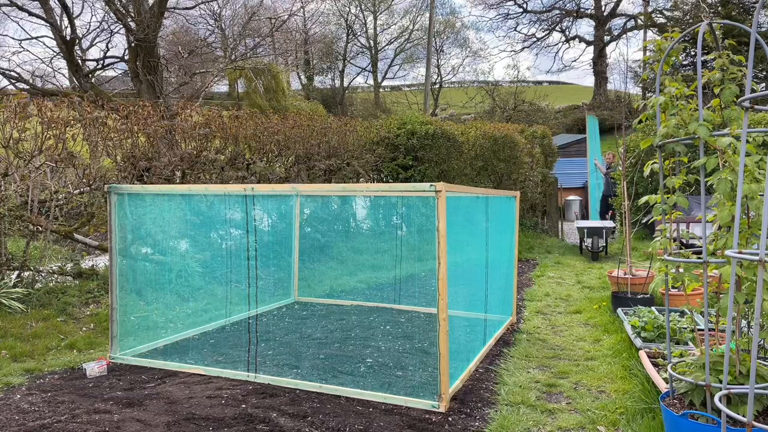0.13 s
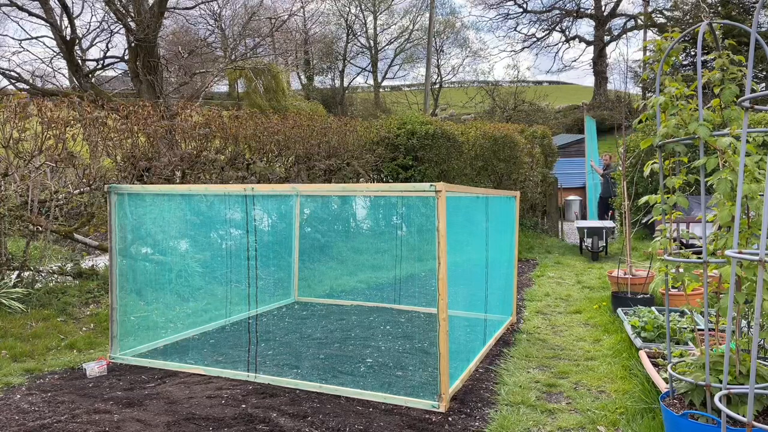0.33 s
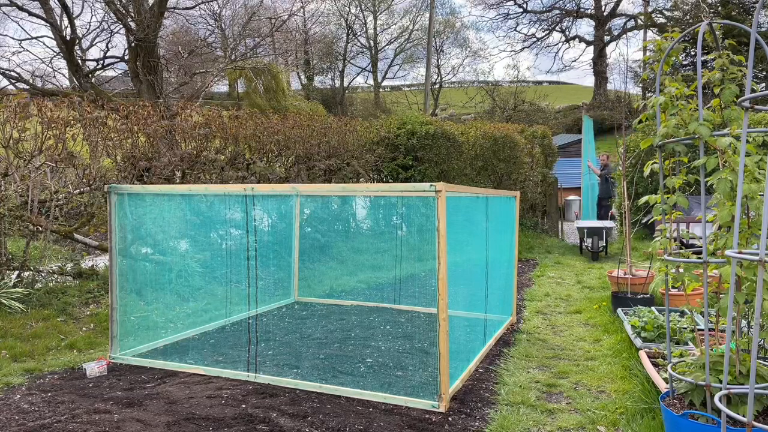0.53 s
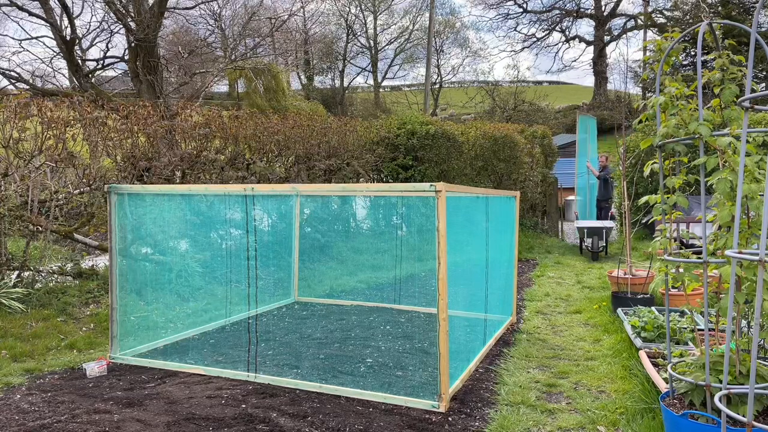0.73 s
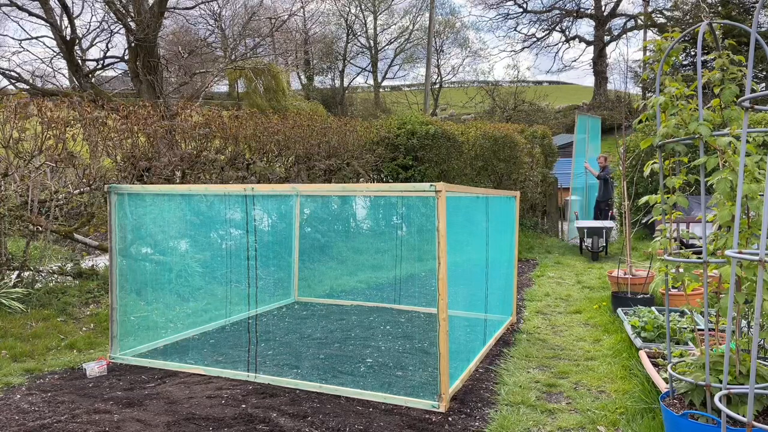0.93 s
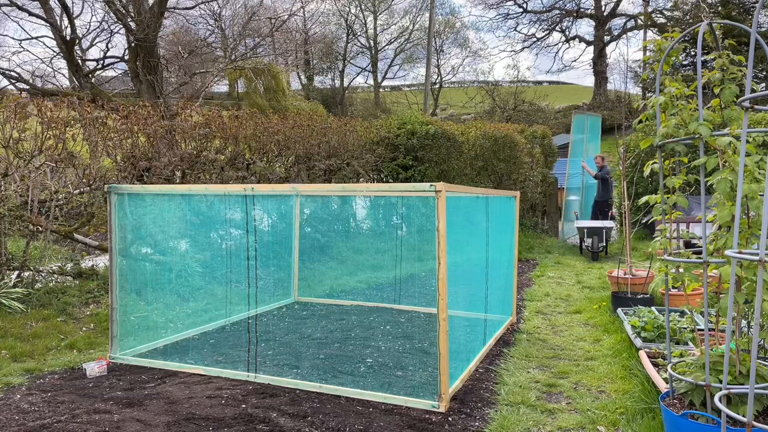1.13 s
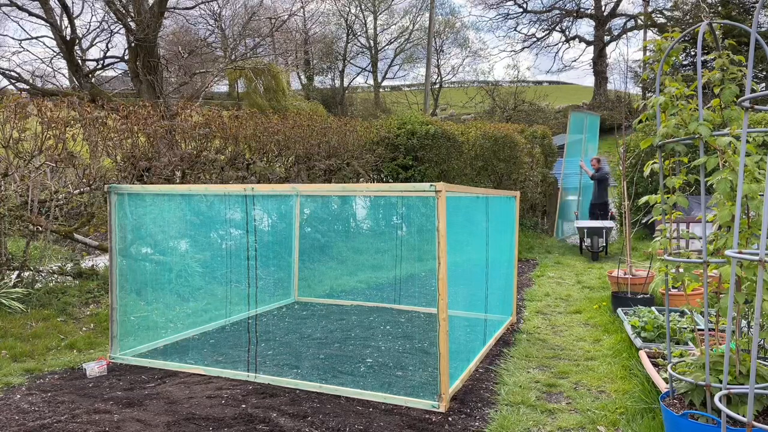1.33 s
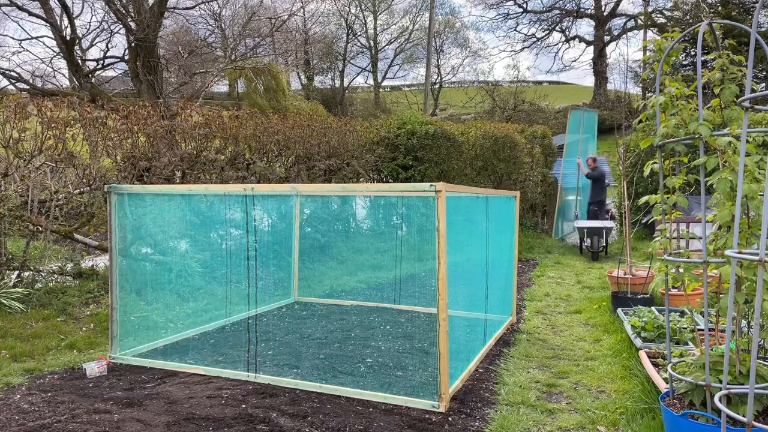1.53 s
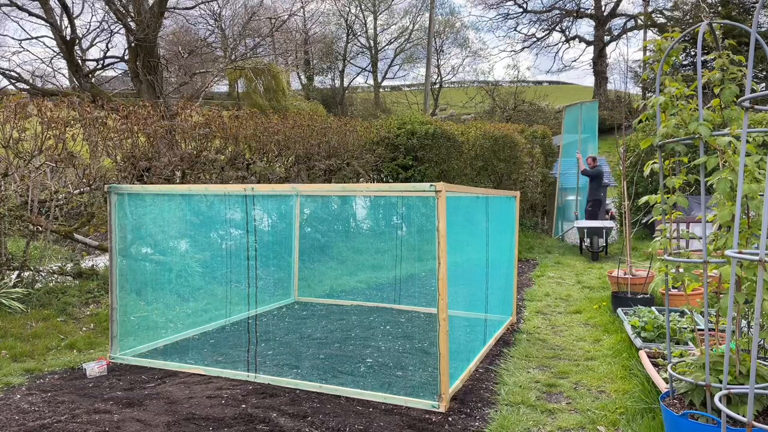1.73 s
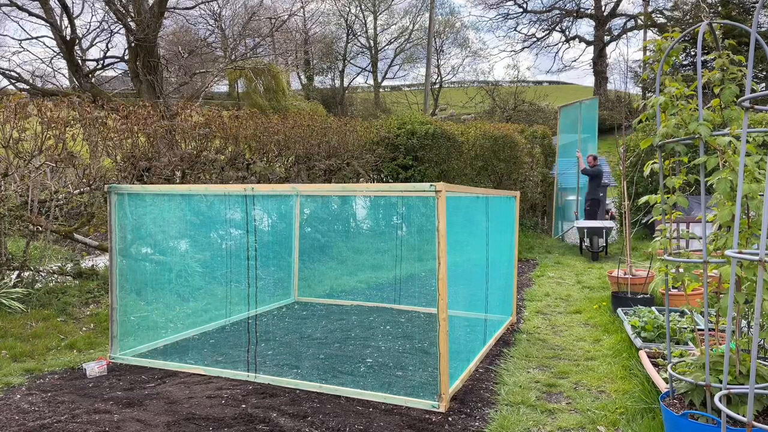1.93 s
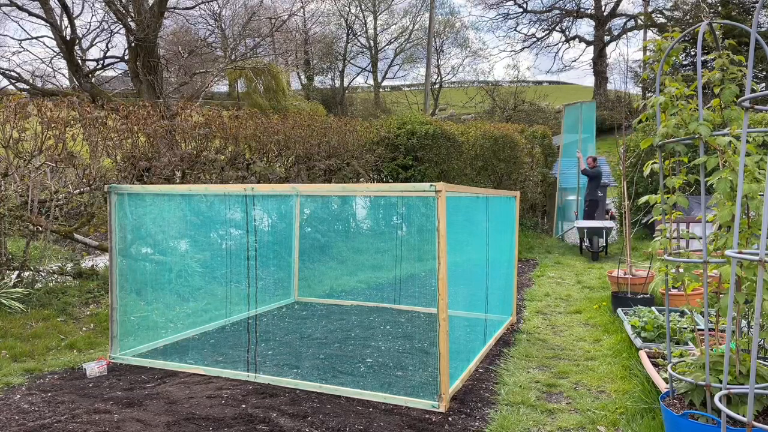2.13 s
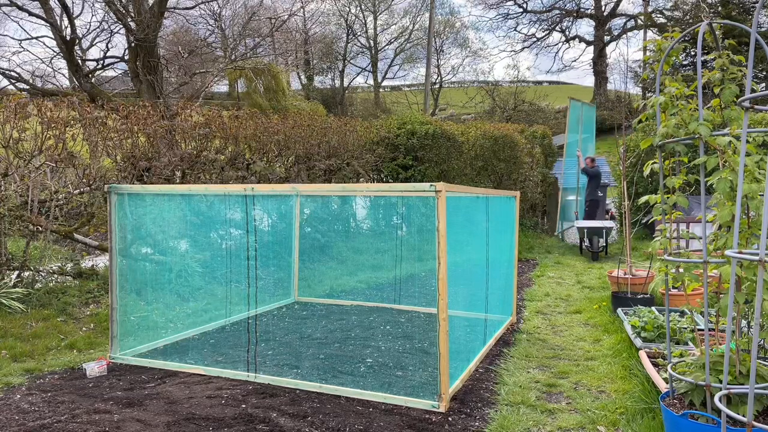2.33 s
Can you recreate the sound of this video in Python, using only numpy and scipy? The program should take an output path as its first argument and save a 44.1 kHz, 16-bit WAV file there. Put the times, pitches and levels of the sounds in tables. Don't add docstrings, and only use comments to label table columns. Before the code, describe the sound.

Sheep bleating faintly, one short call then a longer falling one, after crunchy steps on gritty ground; a netted frame brushes and finally squeaks, with small bird whistles outdoors, heard through a simple handheld microphone.

```python
import sys
import numpy as np
from scipy import signal
from scipy.fft import rfft, irfft, next_fast_len
from scipy.io import wavfile
from scipy.ndimage import uniform_filter1d, map_coordinates

SR = 44100
rng = np.random.default_rng(int(sys.argv[2]) if len(sys.argv) > 2 else 0)


def generate_wav(signal):
    frames = np.transpose(np.atleast_2d(signal))
    scaled = np.clip(frames, -1, 1) * 32767
    pcm = np.round(scaled).astype(np.int16)
    wavfile.write(sys.argv[1], SR, pcm)


def voltage_ratio(level):
    return 10 ** (np.asarray(level, float) / 20)


N = 108045


def unit(x):
    return x / np.sqrt(np.mean(x ** 2) + 1e-20)


def filtered(x, response):
    m = next_fast_len(N + SR // 2)
    return irfft(rfft(x, m) * response(np.fft.rfftfreq(m, 1 / SR)), m)[:N]


def coloured(x, spectrum):
    f, db = np.transpose(spectrum)
    return unit(filtered(x, lambda hz: voltage_ratio(np.interp(np.log(hz + 1), np.log(f + 1), db))))


def resonant(x, peaks):
    def response(f):
        total = 0
        for k, (centre, width, db) in enumerate(peaks):
            mode = 1j * f * width / (centre * centre - f * f + 1j * f * width)
            total = total + (-1) ** k * voltage_ratio(db) * mode ** 2
        return total
    return unit(filtered(x, response))


def wobble(rate):
    knots = rng.standard_normal(int(N * 400 / SR) + 4)
    return map_coordinates(knots, [np.arange(N) * min(rate, 400) / SR])


def strokes(rows, attack_s, t60=None):
    t = np.arange(N) / SR
    power = np.zeros(N)
    for row in rows:
        start, hold, db = row[:3]
        release_s = t60 or row[3]
        fall_db = 60 * np.clip(t - start - hold, 0, 2) / release_s
        power += (voltage_ratio(db - fall_db) * np.clip((t - start) / attack_s, 0, 1)) ** 2
    return np.sqrt(power)


def gritty(spectrum, per_s, bed, lumps_db, lumps_per_s, colour=coloured):
    clicks = (rng.random(N) < per_s / SR) * np.clip(rng.standard_normal(N), -2, 2)
    grains = colour(unit(clicks) + bed * rng.standard_normal(N), spectrum)
    return unit(grains * voltage_ratio(lumps_db * np.clip(wobble(lumps_per_s), -2, 2)))


# frequency in Hz, density in dB per Hz.
WIND_SPECTRUM = [(300, -28), (1480, -15), (3000, -18.5), (4300, -17.5), (5200, -24.5), (7500, -42.5)]
# time in seconds, level in dB.
WIND_LEVEL = [(0, -69.5), (0.201, -69.5), (0.6, -80), (.9, -68), (0.97, -76), (1.101, -58), (2.25, -67.5),
              (2.33, -73), (2.45, -72)]


def air():
    z = signal.stft(rng.standard_normal(N + 512), nperseg=512)[2]
    field = uniform_filter1d(rng.standard_normal(z.shape), size=5, axis=0)
    field = uniform_filter1d(field, size=5, axis=1)
    noise = signal.istft(z * voltage_ratio(4 * unit(field)), nperseg=512)[1][:N]
    level_db = np.interp(np.arange(N) / SR, *np.transpose(WIND_LEVEL))
    return coloured(noise, WIND_SPECTRUM) * voltage_ratio(level_db)


# start in seconds, length in seconds, first and last frequency in Hz, level in dB.
WHISTLES = [(0.179, 0.028, 4470, 4340, -57), (0.468, 0.029, 4300, 5100, -68),
            (0.569, 0.064, 3100, 4660, -74.5), (0.673, 0.056, 3800, 5770, -73),
            (0.804, .02, 3760, 4150, -50.5), (0.924, 0.019, 4100, 5030, -64.5),
            (0.946, 0.017, 4150, 5170, -63), (1.019, 0.022, 3850, 3560, -60.5),
            (1.041, 0.1, 5650, 5350, -71), (1.128, 0.039, 5290, 5350, -59), (1.464, 0.11, 4000, 4000, -52),
            (2.05, 0.028, 4330, 4300, -64), (2.376, 0.062, 4230, 4450, -47)]


def birds():
    blur_hz, bend, soft, waver_db = 90, .75, .75, 3
    out, t = np.zeros(N), np.arange(N) / SR
    blur = blur_hz * wobble(300)
    for start, length, from_hz, to_hz, db in WHISTLES:
        u = np.clip((t - start) / length, 0, 1)
        hz = blur + from_hz + (to_hz - from_hz) * u ** bend
        swell = np.sin(np.pi * u ** soft)
        out += voltage_ratio(db + 3.5) * swell * np.sin(2 * np.pi * np.cumsum(hz) / SR)
    return out * voltage_ratio(waver_db * wobble(120))


# start in seconds, hold in seconds, level in dB, t60 in seconds.
SWISHES = [(.24, 0.033, -37.5, 0.082), (.298, 0.014, -43.5, 0.15), (1.06, 0.031, -70, .1),
           (1.11, 0.039, -47, 0.11), (1.21, 0.061, -48, 0.53), (1.27, 0.017, -49, 0.07),
           (1.34, 0.11, -41.5, 0.27), (1.48, 0.029, -53, 0.12), (1.58, 0.056, -45.5, 0.18),
           (1.678, 0.022, -41, 0.13), (1.73, 0.1, -52, 0.12), (1.9, .11, -55.5, 0.1)]
# frequency in Hz, density in dB per Hz.
NET_SPECTRUM = [(1500, -29.5), (2700, -11.5), (3700, 1.5), (4500, -7.5), (6500, -55)]


def netting():
    return strokes(SWISHES, 0.017) * gritty(NET_SPECTRUM, per_s=1100, bed=1.0, lumps_db=0.5, lumps_per_s=73)


# start in seconds, hold in seconds, level in dB, t60 in seconds.
SQUEAKS = [(2.11, 0.056, -61.5, 0.13), (2.165, 0.014, -48, .08), (2.18, 0.02, -46, 0.055),
           (2.215, 0.033, -54, 0.045), (2.28, 0.014, -66, 0.03)]
# frequency in Hz, width in Hz, level in dB.
FRAME_MODES = [
    (3045, 230, 1),
    (2465, 480, -11),
]


def squeak():
    return strokes(SQUEAKS, 0.004) * resonant(rng.standard_normal(N), FRAME_MODES)


# start in seconds, hold in seconds, level in dB.
THUDS = [(0.01, 0.012, -68), (.235, 0.069, -56), (.34, 0.2, -63), (.79, 0.12, -65.5), (1.06, 0.58, -65),
         (1.28, 0.042, -52.5), (1.375, 0.093, -51.5), (1.57, 0.1, -56.5), (1.684, 0.013, -34.5),
         (1.715, .12, -54), (1.9, 0.14, -64), (2.07, 0.044, -66), (2.125, 0.052, -57), (2.195, .07, -61),
         (2.29, 0.17, -72)]
# frequency in Hz, width in Hz, level in dB.
GROUND_MODES = [(92, 54, -31.5), (216.3, 138, -0.5), (320, 91, -0.5), (416.7, 180, -2)]


def thuds():
    ground = gritty(GROUND_MODES, per_s=200, colour=resonant, bed=1.7, lumps_db=3.0, lumps_per_s=27)
    return strokes(THUDS, 0.0069, 0.15) * ground


# start in seconds, hold in seconds, level in dB, t60 in seconds.
GRINDS = [(.029, 0.0028, -50, 0.018), (.23, 0.0064, -41.5, 0.15), (.25, 0.036, -32, 0.048),
          (.306, 0.0022, -37, 0.078), (.335, 0.014, -54.5, 0.25), (.784, 0.005, -50, 0.059),
          (.8, 0.015, -51, 0.03), (.825, 0.024, -54, .03), (.875, 0.038, -72.5, 0.046),
          (.998, 0.0044, -58.5, 0.017), (1.2, 0.091, -62, 0.066), (1.28, 0.0087, -37.5, 0.17),
          (1.295, 0.008, -35, 0.034), (1.32, 0.051, -42.5, 0.17), (1.36, 0.092, -38, 0.12),
          (1.445, 0.049, -47.5, 0.097), (1.575, 0.093, -53.5, 0.38), (1.688, 0.017, -36, 0.049),
          (1.72, .12, -58.5, 0.06), (1.9, 0.028, -56.5, 0.33), (2.15, 0.013, -57.5, 0.1),
          (2.182, 0.017, -48, 0.042), (2.21, 0.045, -63, 0.28)]
# frequency in Hz, density in dB per Hz.
STONE_SPECTRUM = [(3000, -26), (4300, -11), (5900, -3.5), (6900, -5.5), (8100, -35)]


def grit():
    return strokes(GRINDS, 0.0042) * gritty(STONE_SPECTRUM, per_s=2200, bed=0.55, lumps_db=2.5, lumps_per_s=90)


# start in seconds, hold in seconds, level in dB, t60 in seconds.
CRUNCHES = [(.228, 0.031, -42.5, 0.087), (.248, 0.026, -33.5, 0.18), (.305, 0.011, -36.5, 0.12),
            (.34, 0.058, -44.5, 0.25), (.785, 0.0033, -45.5, 0.053), (.8, 0.014, -42.5, 0.08),
            (.822, 0.018, -50.5, 0.1), (.874, 0.046, -58.5, 0.04), (1.29, 0.071, -54, .1),
            (1.365, 0.05, -52, 0.6), (1.686, 0.0085, -40, .12), (2.18, 0.0056, -56.5, 0.2)]
# frequency in Hz, width in Hz, level in dB.
SOIL_MODES = [(400, 120, -12.5), (731, 255, 1.5), (1200, 454, 1.5), (1920, 980, -2), (3040, 1640, -12)]


def soil():
    clods = gritty(SOIL_MODES, per_s=400, colour=resonant, bed=0.98, lumps_db=1.5, lumps_per_s=100)
    return strokes(CRUNCHES, 0.0015) * clods


# time in seconds, peak level in dB, frequency in Hz.
SNAPS = [(.119, -47, 1420), (.131, -59.5, 1510), (.345, -24.5, 1110), (.365, -32.5, 890), (.41, -35, 1330),
         (.435, -35.5, 904), (0.251, -21, 1140), (0.306, -21.5, 753), (0.324, -19, 953),
         (0.384, -25.5, 1010), (0.712, -24.5, 1326), (.727, -38, 1245), (0.752, -39, 1180),
         (.776, -54, 1370), (.784, -32.5, 1540), (.801, -32, 732), (0.821, -23.5, 1200), (.828, -27, 906),
         (.836, -24.5, 780), (.846, -39, 676), (.856, -36.5, 1255), (.876, -29, 790), (0.893, -21, 1280),
         (.905, -35, 1265), (.925, -43.5, 757), (1.295, -27.5, 583), (1.31, -30.5, 607),
         (1.342, -33.5, 1010), (1.366, -25, 1120), (1.382, -33.5, 1046), (1.407, -31, 1024),
         (1.43, -36.5, 990), (1.684, -29.5, 400), (1.691, -26, 312), (1.719, -39, 370), (2.19, -36.5, 1115),
         (2.222, -43, 1066), (2.258, -49.5, 1090), (2.285, -51.5, 950)]
# frequency in Hz, width in Hz, level in dB.
CRUMB_MODES = [(810, 230, -3.5), (1280, 520, -2.5), (2100, 800, -10)]


def knocks():
    t60_s, crumble, rise_s = .032, .4, .0022
    out, t = np.zeros(N + SR), np.arange(SR // 20) / SR
    crumbs = resonant(rng.standard_normal(N), CRUMB_MODES)
    rise = np.sin(np.pi / 2 * np.clip(t / rise_s, 0, 1)) ** 2
    for start, db, hz in SNAPS:
        at = round(start * SR)
        ring = np.sin(2 * np.pi * hz * t) + crumble * np.roll(crumbs, -at)[:len(t)]
        out[at:at + len(t)] += voltage_ratio(db - 6 - 60 * t / t60_s) * rise * ring
    return out[:N]


# time in seconds, frequency in Hz.
BLEAT_PITCH = [
    [(.99, 163.3), (1.09, 149.6), (1.15, 162.1), (1.2, 166.2), (1.27, 165.5)],
    [(1.54, 164.3), (1.59, 158.7), (1.64, 162.1), (1.76, 158.8), (1.86, 150.5), (2, 143.6)],
]
# time in seconds, ratio of breath to pulses.
BREATHINESS = [(1.0, .9), (1.2, .75), (1.6, .7), (1.8, .8), (1.86, .35), (1.98, .4), (2.03, 1.2)]
# time in seconds, place from 0 (low) to 1 (high).
TONGUE_PLACE = [(.99, 0.23), (1.05, 0.64), (1.13, 0.67), (1.21, 0.47), (1.25, 0.9), (1.53, 0.23),
                (1.62, 0.43), (1.7, 0.34), (1.78, 0.72), (1.82, 0), (1.88, 0.72), (1.97, 0.67), (2.04, .2),
                (2.1, 0.7)]
# frequency in Hz, width in Hz, level in dB.
NOSE_MODES = [(719, 174, 0)]
# frequency in Hz, width in Hz, level in dB.
LOW_MODES = [
    [(1630, 300, 1), (1280, 340, -15.5)],
    [(1609, 199, 1.5), (1320, 306, -12.5)],
]
# frequency in Hz, width in Hz, level in dB.
HIGH_MODES = [
    [(2147, 460, -7.5), (2694, 397, -11)],
    [(2351.7, 270, 0), (2910, 530, -11.5)],
]
# start in seconds, hold in seconds, level in dB,
# jaw balance of upper over lower resonance in dB.
BREATH_PUSHES = [(0.983, 0.017, -54.5, -5), (1.002, 0.04, -44, 6), (1.076, 0.043, -35, 0),
                 (1.139, 0.015, -30, -1), (1.167, 0.026, -33, 2.5), (1.518, 0.027, -45.5, -5),
                 (1.543, 0.018, -33.5, 1.5), (1.565, 0.037, -38, -7), (1.608, 0.091, -37, -5),
                 (1.717, 0.096, -44, -7), (1.819, 0.12, -42.5, 12.5), (1.84, 0.034, -34, 5),
                 (1.859, 0.033, -33, -2), (1.896, 0.029, -42.5, 1), (1.939, 0.048, -35.5, 4),
                 (1.986, 0.012, -56, 7), (2.032, 0.032, -58, 20.5), (2.071, 0.028, -64, 18),
                 (2.105, 0.043, -67, -7)]
# start in seconds, hold in seconds, level in dB.
NOSE_HUM = [(1.01, 0.12, -70.5), (1.09, .165, -51), (1.56, 0.46, -63.5), (1.75, 0.11, -50.5),
            (1.87, 0.076, -59), (1.97, 0.053, -56.5)]


def glottis():
    jitter, shimmer_db = .01, 1.5
    t = np.arange(N) / SR
    hz = np.interp(t, *np.concatenate(BLEAT_PITCH).T) * (1 + jitter * wobble(90))
    cycles = np.cumsum(hz) / SR
    shimmer = voltage_ratio(shimmer_db * np.clip(rng.standard_normal(N), -1.5, 1.5))
    pulses = np.diff(np.floor(cycles), prepend=0) * shimmer
    breath = np.exp(-2.2 * (cycles % 1)) * rng.standard_normal(N)
    return unit(pulses) + np.interp(t, *np.transpose(BREATHINESS)) * unit(breath)


def hillside(voice):
    t60_s, level_db = .22, -4
    t = np.arange(SR // 2) / SR
    tail = rng.standard_normal(len(t)) * voltage_ratio(-60 * t / t60_s)
    return voltage_ratio(level_db) * signal.fftconvolve(voice, tail / np.linalg.norm(tail))[:N]


def ewe():
    tongue_reach, tongue_shake = .055, .15
    second_bleat_s = 1.4
    t = np.arange(N) / SR
    source = glottis()
    tongue = np.interp(t, *np.transpose(TONGUE_PLACE)) + tongue_shake * wobble(25)
    place = 4 * np.clip(tongue, 0, 1) - 2

    def moving(peaks):
        out = np.zeros(N)
        for way in range(-2, 3):
            moved = resonant(source, np.multiply(peaks, [1 + way * tongue_reach / 2, 1, 1]))
            out += np.clip(1 - np.abs(place - way), 0, 1) * moved
        return out

    def push(order):
        rows = [(s, hold, db - 3.5 + order * jaw_db / 2) for s, hold, db, jaw_db in BREATH_PUSHES]
        return strokes(rows, .011, .09)

    low = np.where(t < second_bleat_s, moving(LOW_MODES[0]), moving(LOW_MODES[1]))
    high = np.where(t < second_bleat_s, moving(HIGH_MODES[0]), moving(HIGH_MODES[1]))
    hum = strokes(NOSE_HUM, 0.022, 0.052) * voltage_ratio(2.2 * wobble(40.25)) * moving(NOSE_MODES)
    voice = push(-1) * low - push(1) * high + hum
    return voice + hillside(voice)


def scene():
    carried = netting() + squeak()
    footfalls = thuds() + grit() + soil() + knocks()
    return (air() + birds() + carried + footfalls + ewe())[None]


def roll_off(x):
    return signal.sosfilt(signal.butter(12, 8160, fs=SR, output="sos"), x)


def record(dry):
    top_hz, edge_hz, hiss_db = 7650, 150, -97

    def band(hz):
        high_cut = 1 / (1 + np.exp(np.clip((hz - top_hz) / edge_hz, -50, 50))) * (hz < 8300)
        return high_cut / (1 + (55 / (hz + 1)) ** 2)

    mix = filtered(dry[0], band) + voltage_ratio(hiss_db) * rng.standard_normal(N)
    return roll_off(mix[None])


dry = scene()
out = record(dry)
generate_wav(out)
```